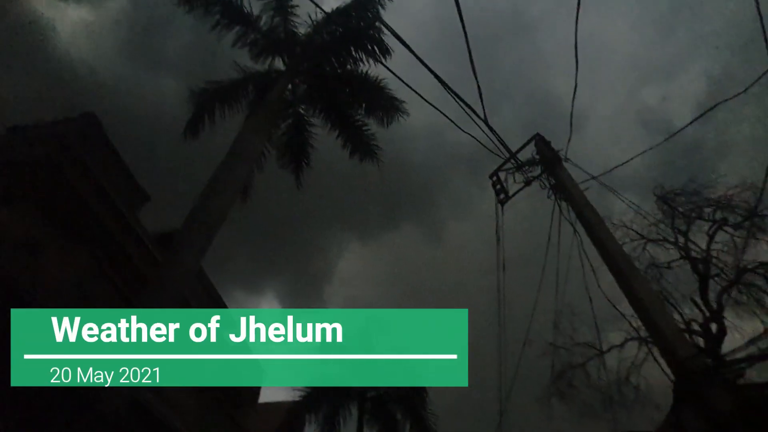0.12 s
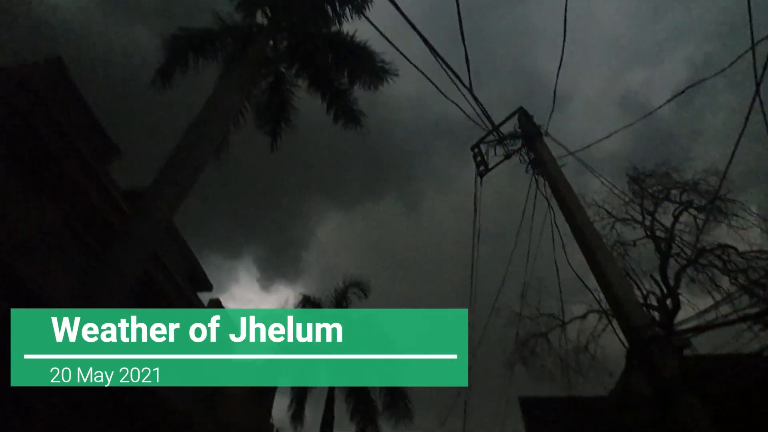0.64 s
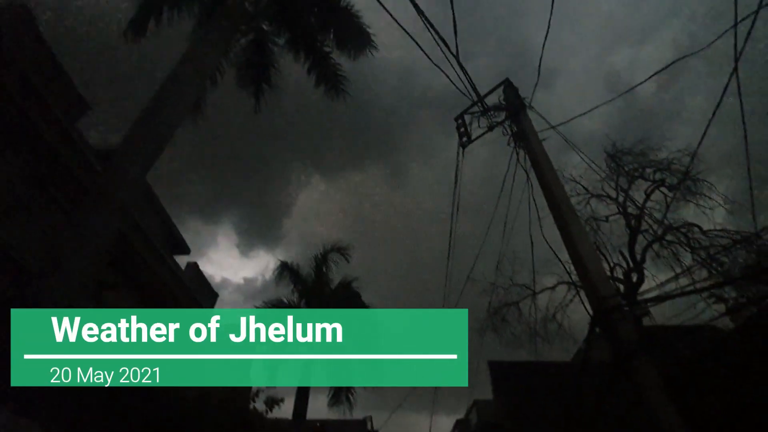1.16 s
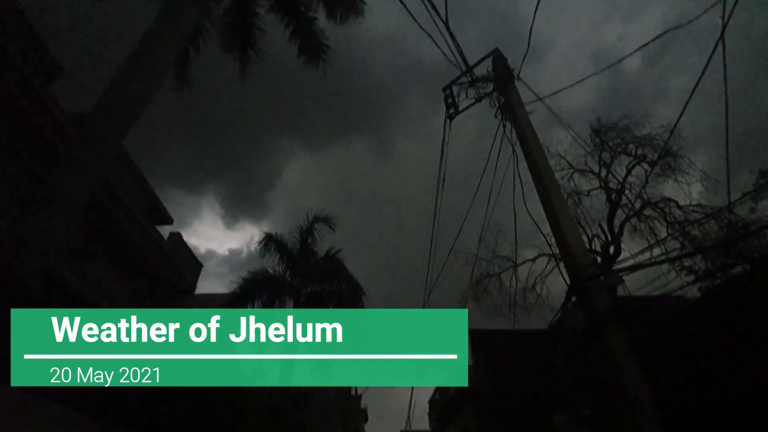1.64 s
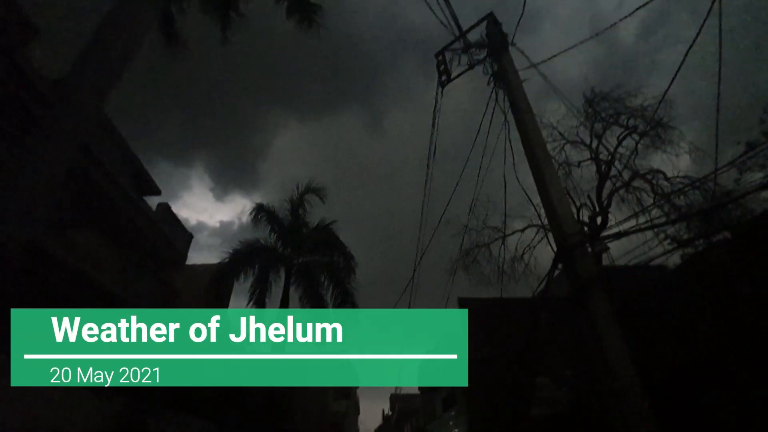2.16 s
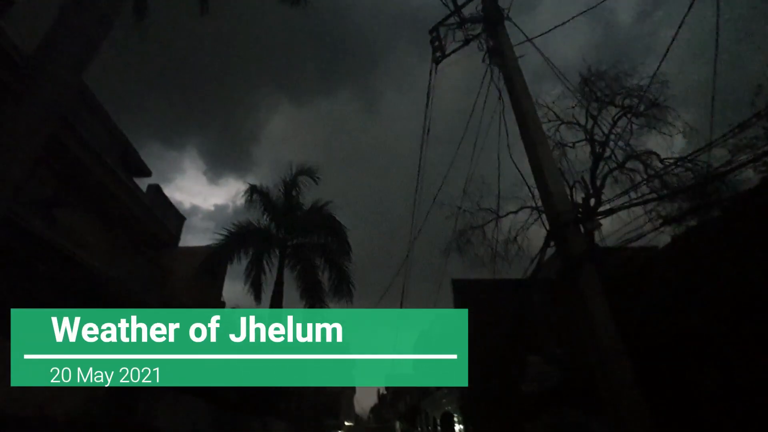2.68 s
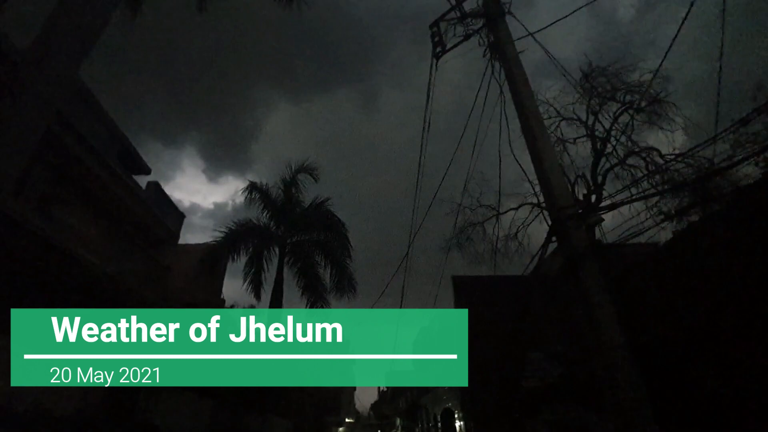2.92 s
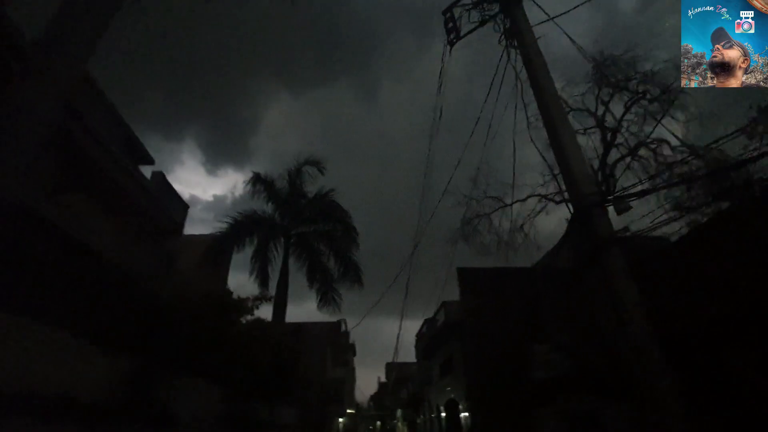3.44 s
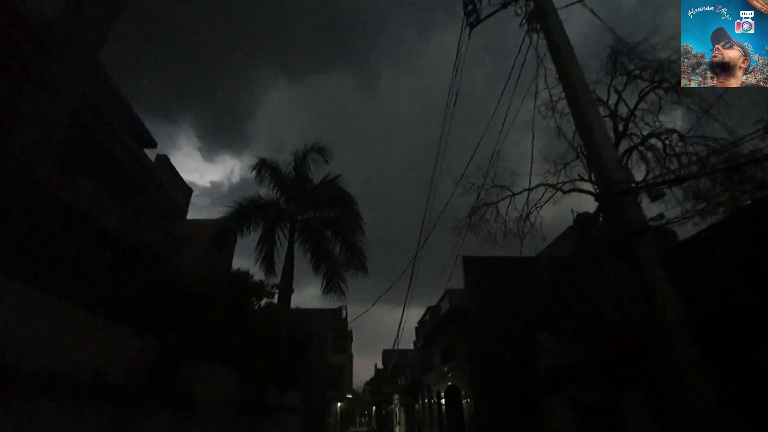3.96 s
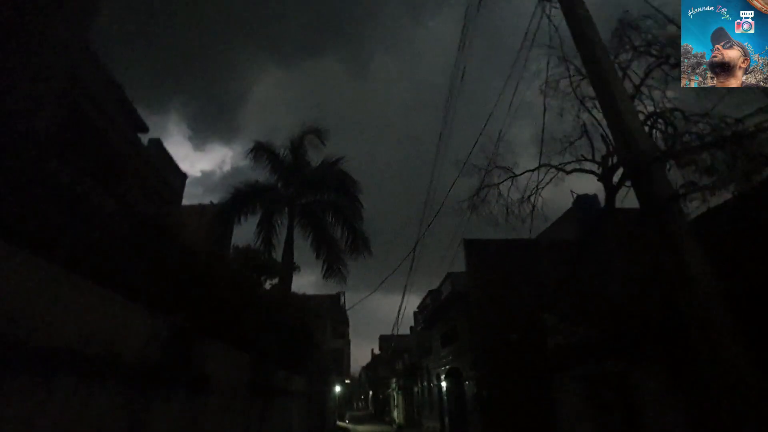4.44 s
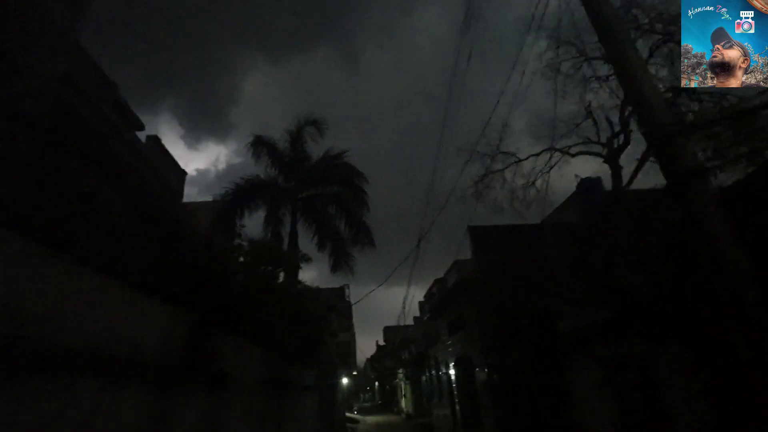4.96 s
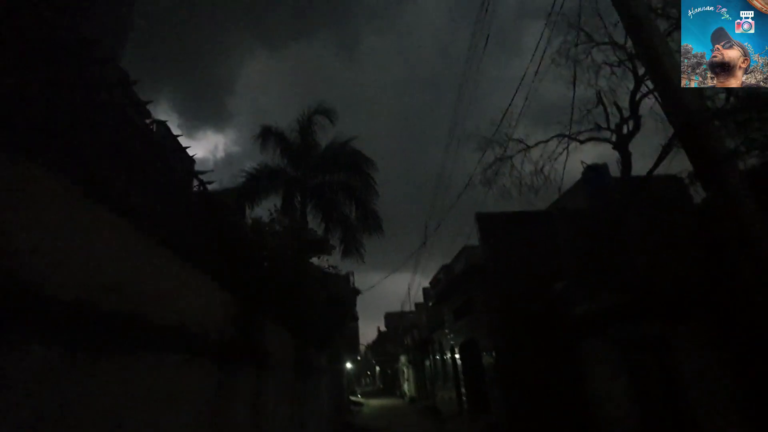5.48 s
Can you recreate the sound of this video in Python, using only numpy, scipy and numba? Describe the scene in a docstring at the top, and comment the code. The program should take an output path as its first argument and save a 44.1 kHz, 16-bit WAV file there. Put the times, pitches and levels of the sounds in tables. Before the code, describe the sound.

After a brief silence, dense rain and small splashes, faint distant rumbling, then close thunder erupts in distorted, tumbling bass blasts.

```python
"""Thunder creeps in as a crackling roll over a street, then breaks into overloading booms.
Shocks from the crooked lightning channel arrive by the hundred and echo between the house fronts.
Heavy rain hisses as random drops over noise; run-off splashes, and far thunder murmurs as a narrow band of bass.
A stereo microphone opens after a short silence; its limiter pulls the rain down under the loudest booms."""
import sys
import numpy as np
from scipy import signal
from scipy.fft import rfft, irfft
from scipy.io import wavfile
from scipy.ndimage import uniform_filter1d, minimum_filter1d
from numba import njit

SR = 44100
rng = np.random.default_rng(int(sys.argv[2]) if len(sys.argv) > 2 else 0)


def wrap_up_sound(samples):
    """Save the sound to the file named by the first command line argument, as 16-bit audio."""
    columns = np.atleast_2d(samples).T
    # keep every value between -1 and 1, then stretch to whole-number steps
    tamed = np.clip(columns, -1, 1)
    steps = np.round(tamed * 32767).astype(np.int16)
    wavfile.write(sys.argv[1], SR, steps)


def volts_from_decibels(level):
    """Turn decibel levels (scalar or array-like) into linear amplitude factors."""
    exponent = np.asarray(level, float) / 20
    return 10 ** exponent


N = 246959
TIME = np.arange(N) / SR
HZ = np.fft.rfftfreq(N, 1 / SR) + 1e-3  # just above zero, so that its logarithm exists

# Peals of the roll, each swelling up to its time and fading after.
# Each row: time in seconds, rumble in dB, crackle over rumble in dB, deep heave over rumble in dB,
# rise in ms, fade in dB per second.
PEALS = [(2.84, -37, -9, -7, 12, 46), (3.04, -42, -2, -13, 90, 19), (3.2, -35, -4.5, -10, 56, 9),
         (3.34, -35.5, -7, -1, 150, 42), (3.53, -35, -9, -10, 61, 28), (3.591, -28.5, -4, -2, 9.1, 25),
         (3.8, -27.5, -6.5, -10, 96, 16), (4.02, -24.5, -12.5, -18, 49, 44),
         (4.127, -8.5, -19.5, -8.5, 7.6, 14), (4.29, -5, -19.5, -14, 45, 44),
         (4.489, -8.5, -12, -6, 7.4, 48), (4.6, -13, -29, -11, 54, 34), (4.765, -7.5, -23, -2, 11, 29),
         (4.94, -7, -16.5, 1, 120, 66), (5.07, -16, -11.5, -1, 50, 26),
         (5.255, -11.5, -16.5, -11.5, 27, 62), (5.47, -14, -14.5, -5, 96, 41)]


def band(x, low_hz, high_hz, order=2):
    """Band-pass to rms 1."""
    sos = signal.butter(order, [low_hz, min(high_hz, SR / 2.1)], "bandpass", fs=SR, output="sos")
    y = signal.sosfilt(sos, x)
    return y / np.sqrt(np.mean(y ** 2))


def walk(rate, size=N):
    """Random levels held for 1 / rate seconds, then slewed twice; spread near 1."""
    hold = int(SR / rate)
    levels = np.repeat(rng.standard_normal(size // hold + 1), hold)
    slewed = uniform_filter1d(uniform_filter1d(levels, hold), hold)
    return 1.44 * slewed[:size]


def impacts(per_s, scatter_db):
    """Random arrivals of either sign, a few much larger than the rest."""
    hit, size, sign = rng.random((N, 3)).T
    strength = volts_from_decibels(-scatter_db * np.log(1 - size))
    return (hit < per_s / SR) * strength * np.sign(sign - .5)


def pan(db):
    """Left and right gain for a level difference, left minus right."""
    return volts_from_decibels(np.array([[db], [-db]]) / 2)


def colour(points):
    """Gain at every frequency from (Hz, dB) points."""
    hz, db = np.transpose(points)
    return volts_from_decibels(np.interp(np.log(HZ), np.log(hz), db))


def rain():
    """Countless drops over distant hiss, in overlapping half-octave bands that patter together and flicker alone."""
    # Colour of the rain. Each row: frequency in Hz, relative level in dB per Hz.
    spectrum = [(12, -36), (20, -7), (32, -12), (70, -6.5), (106, -5.5), (191, -8.5), (274, -9), (534, -15),
                (705, -11.5), (1070, -14.5), (3170, -14.5), (9660, -18.5), (15500, -24)]
    # Width of the rain around the microphone. Each row: frequency in Hz, side minus mid in dB.
    width = [(60, -5.5), (700, -9), (2400, -9), (4400, -6.5), (8100, -2.5), (15000, -6.5)]
    rain_db, left_db = -37, 0.76
    mid, side = (rfft(rng.standard_normal(N) + 1.22 * impacts(3000, 1.4)) * colour(spectrum)
                 for _ in range(2))
    ears = mid + colour(width) * side * np.array([[1], [-1]])
    shared_db = 0.46 * walk(12)
    out = 0
    for step in range(9, 29):  # band centres at 2 ** (step / 2) Hz
        share = np.clip(1 - np.abs(2 * np.log2(HZ) - step), 0, 1)
        flicker = volts_from_decibels(0.8 * walk(min(10, 2 ** (step / 2) / 8)))  # low bands flicker more slowly
        out = out + flicker * irfft(ears * share, N)
    mid_rms = np.sqrt(np.mean(out.mean(axis=0) ** 2))
    return out * volts_from_decibels(rain_db + shared_db) * pan(left_db) / mid_rms


def splashes():
    """Gathered water spills on the ground: a quick rise and short fade of fizz."""
    # Splashes of run-off. Each row: time in seconds, level at the top in dB, lowest Hz, highest Hz.
    spills = [(0.364, -42, 2500, 7000), (.515, -38, 2900, 6500), (.715, -35.5, 3000, 14000),
              (1.054, -39.5, 1980, 4940), (1.135, -42, 5000, 13000), (1.23, -41, 2500, 7000),
              (1.63, -40.5, 5000, 13000), (2.62, -46, 6040, 11000), (2.961, -43, 2500, 7850),
              (3.8, -42, 3000, 9000), (4.66, -39, 2930, 6780), (4.875, -42, 3000, 9000),
              (5.419, -37, 4040, 6450)]
    rise_s = 0.017
    out = np.zeros((2, N))
    t = TIME[:SR // 6]
    fade = t / rise_s
    swell = fade * np.exp(1 - fade)
    for s, db, low_hz, high_hz in spills:
        fizz = rng.standard_normal(len(t)) + 0.55 * rng.standard_normal((2, len(t)))
        start = int((s - .008) * SR)
        out[:, start:start + len(t)] += volts_from_decibels(db) * band(fizz, low_hz, high_hz) * swell
    return out


def murmur():
    """Far thunder comes and goes; distance leaves only a narrow band of bass."""
    # Level of the far thunder. Each row: time in seconds, level in dB.
    swells = [(0.34, -57), (0.49, -56), (0.68, -43.5), (0.88, -48.5), (1.15, -42.5), (1.26, -54),
              (1.33, -44), (1.65, -40.5), (1.72, -46.5), (2.24, -49), (2.36, -44), (2.48, -67),
              (2.84, -39.5), (2.95, -56)]
    s, db = np.transpose(swells)
    far = rng.standard_normal(N) + 0.43 * rng.standard_normal((2, N))  # shared by both ears, plus each alone
    return band(far, 85.6, 141.5) * volts_from_decibels(np.interp(TIME, s, db))


def peals(crackle, heave):
    """Power sum of all peals, as a gain, for shocks that take these shares of crackle and heave."""
    power = 0
    for s, db, crackle_db, heave_db, rise_ms, fade_db in PEALS:
        rise = np.clip(1 + 1000 * (TIME - s) / rise_ms, 0, 1)
        level_db = db + crackle * crackle_db + heave * heave_db
        faded_db = level_db - fade_db * np.maximum(TIME - s, 0)
        power = power + (rise * volts_from_decibels(faded_db)) ** 2
    return np.sqrt(power)


def street(x):
    """Echoes between house fronts: a fading scatter, different at each ear."""
    t60_s, onset_s = 0.45, 0.0043
    t = TIME[:SR]
    fade = np.exp(-np.log(1000) * t / t60_s) * np.minimum(t / onset_s, 1)
    echoes = rng.standard_normal((2, SR)) * fade
    echoes = echoes / np.sqrt(np.sum(echoes ** 2, axis=1, keepdims=True))
    return signal.fftconvolve(x[None], echoes, axes=1)[:, :N]


def roll():
    """Each bend of the channel sends an N-shaped shock; long bends rumble, short ones crackle."""
    # Kinds of shock. Each row: length of the longer bends in ms, arrivals per second for each bend length,
    # size scatter in dB, lowest Hz, highest Hz, left minus right in dB, share of crackle, share of heave.
    kinds = [(5.09, 570, 1.5, 62.4, 289, 3, 0, 0.03), (1.66, 600, 2.5, 310, 719, 3, .4, 0),
             (0.535, 1600, 1.5, 430, 1390, 1, 1, 0.19), (25.3, 90, 4, 29, 83, 5, 0.16, 1)]
    street_db = -3  # echoes against direct sound
    out = 0
    for ms, per_s, scatter_db, low_hz, high_hz, left_db, crackle, heave in kinds:
        shapes = [np.linspace(1, -1, int(ms * bend * SR / 1000)) / bend for bend in (.6, 1)]
        arrivals = sum(np.convolve(impacts(per_s, scatter_db), shape)[:N] for shape in shapes)
        shocks = band(arrivals, low_hz, high_hz)
        echoing = (shocks + volts_from_decibels(street_db) * street(shocks)) / np.sqrt(1 + volts_from_decibels(2 * street_db))
        out = out + echoing * pan(left_db) * peals(crackle, heave)
    return out


def lesser_booms():
    """Random rows like the loudest booms, set by the rumble just before them; higher ones are weaker and shorter."""
    count, first_s = 200, PEALS[0][0]
    low_hz, span_octaves, low_ms = 109.85, 2.4, 26
    over_rumble_db, db_per_octave, scatter_db = -1, -3.5, 3.3
    mean_left_db, spread_db = 1, 4.5
    when, pitch = rng.random((count, 2)).T
    size, length, side = rng.standard_normal((count, 3)).T
    s = first_s + when * (N / SR - first_s)
    octaves = pitch * span_octaves
    rumble = np.interp(s - low_ms / 1000, TIME, peals(0, 0))
    rumble_db = 20 * np.log10(rumble + 1e-6)
    db = rumble_db + over_rumble_db + db_per_octave * octaves + scatter_db * size
    hz = low_hz * 2 ** octaves
    ms = low_ms * 0.75 ** octaves * 1.35 ** length
    left_db = mean_left_db + spread_db * side
    return list(zip(s, db, hz, ms, left_db))


def booms():
    """Bends lying side-on arrive in step: a few cycles, rising faster than they fade, a little later at one ear."""
    # The loudest booms. Each row: time in seconds, level in dB, frequency in Hz, nominal length in ms,
    # left minus right in dB.
    loudest = [(2.836, -33.5, 169.4, 22, 3), (3.234, -28.5, 93, 56, 0), (3.302, -27, 238, 51, 0),
               (3.316, -31, 303, 30, 2.2), (3.354, -22, 126, 24, -2), (3.598, -22.5, 152.5, 43, 5),
               (3.62, -22, 258, 15, 5), (3.771, -17.5, 116, 17, 3), (3.833, -20, 142, 45, 6),
               (4.127, -0.5, 118, 22, 7.5), (4.163, -12.5, 250, 15, 12), (4.184, -7.5, 371, 31, 9),
               (4.188, -1, 167.6, 54, 6.5), (4.278, 2.5, 131.7, 56, -2.5), (4.305, 4.5, 146, 16, -8),
               (4.318, 1, 223, 12.4, -1), (4.369, 5, 146, 12, 2.3), (4.492, -3, 416, 15, 12),
               (4.5, -2.5, 501, 20, 6), (4.522, -7, 408, 35, 10), (4.508, 1, 128, 11, 12),
               (4.524, -0.3, 266, 14, 4), (4.566, -2.5, 361, 20, 5), (4.604, -1.8, 141, 14, 0),
               (4.621, -10, 290, 24, -9), (4.875, -3.5, 164, 41, 6), (4.765, -4, 159.6, 44, 6.5),
               (4.791, 2.5, 105, 42, 8), (4.817, 4, 153.5, 13, -.6), (4.893, -1.5, 228, 30, 2),
               (4.91, -6.5, 140.4, 110, -3), (4.927, 1, 60.4, 26, 2), (4.966, 4.5, 157.3, 53, -3.5),
               (5.064, -2.2, 134, 46, 5), (5.114, -4, 209, 18, 3.5), (5.215, -6, 145, 25, 3),
               (5.26, -5, 267, 38, 5), (5.41, -11, 59, 22, 6), (5.446, -11.5, 162, 54, 3),
               (5.481, -2.5, 147, 26, 6)]
    out = np.zeros((2, N))
    rows = list(loudest) + lesser_booms()
    chance = rng.standard_normal((len(rows), 3))
    for (s, db, hz, ms, left_db), (turn, skew, glide) in zip(rows, chance):
        near = slice(int((s - .08) * SR), int((s + .14) * SR))
        t = TIME[near] - s
        rough = volts_from_decibels(1.45 * walk(110.5, size=len(t)))  # scattering on the way breaks up the longer booms
        swell = np.exp(-np.log(2) * (2000 * t / ms / np.where(t < 0, .6, 1.15)) ** 2)
        ear_shift = 0.38 * skew * np.array([[1], [-1]])
        phase = 2 * np.pi * hz * t * (1 + 0.79 * glide * t) + 2 * turn + ear_shift
        wave = np.sin(phase + 0.21 * np.sin(phase))  # loud waves steepen at the front
        out[:, near] += volts_from_decibels(db) * pan(left_db) * swell * rough * wave
    return out


def scene():
    """Rain and thunder together."""
    return rain() + splashes() + murmur() + roll() + booms()


@njit
def limiter(peak, top, ratio, attack, release):
    """One gain for both channels, falling fast above the threshold and recovering slowly."""
    gain, envelope = np.ones(len(peak)), 0.
    for i in range(len(peak)):
        envelope += (peak[i] - envelope) * (attack if peak[i] > envelope else release)
        if envelope > top:
            gain[i] = (top / envelope) ** (1 - 1 / ratio)
    return gain


def roll_off(x):
    """The treble ends steeply here."""
    return signal.sosfilt(signal.butter(12, 15660, fs=SR, output="sos"), x)


def record(dry):
    """The microphone opens late and cuts the top; a look-ahead limiter tames the peaks, and the rest clips."""
    top_hz, open_s = 15500, .2728
    attack_s, release_s = 0.0043, .22
    dry = signal.sosfilt(signal.ellip(8, .2, 70, top_hz, fs=SR, output="sos"), dry)
    peak = -minimum_filter1d(-np.abs(dry).max(axis=0), size=441)  # highest within 5 ms either side
    gain = limiter(peak, 1.0, 7.5, 1 / (attack_s * SR), 1 / (release_s * SR))
    gain = uniform_filter1d(gain, size=221)
    loud = np.clip(dry * gain, -1, 1) * (TIME > open_s)
    return roll_off(loud)


dry = scene()
out = record(dry)
wrap_up_sound(out)
```